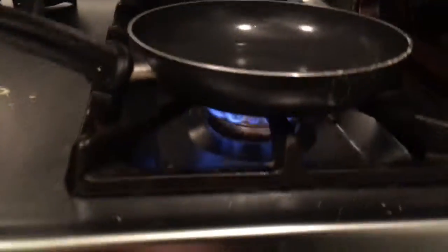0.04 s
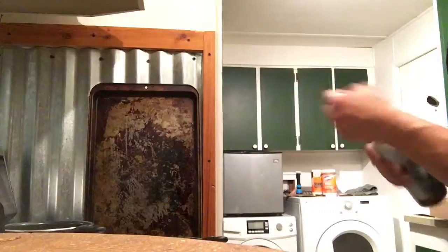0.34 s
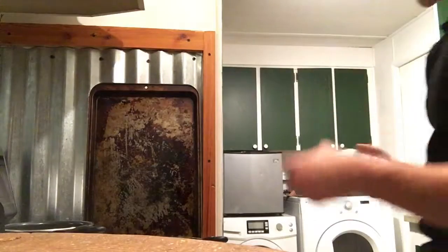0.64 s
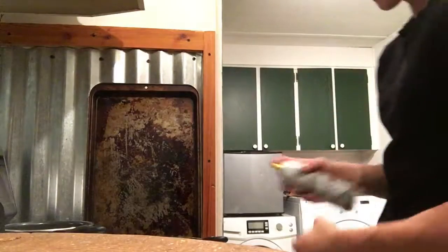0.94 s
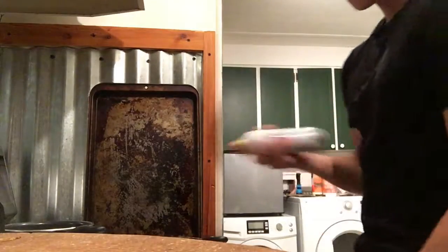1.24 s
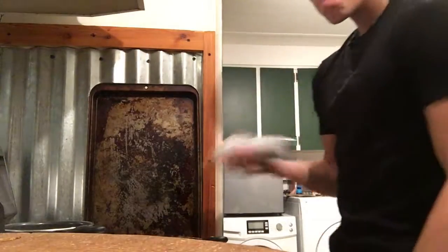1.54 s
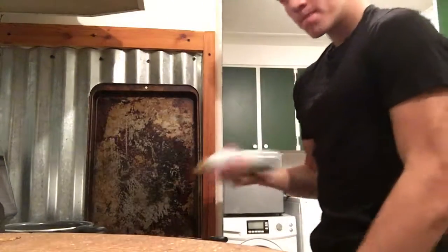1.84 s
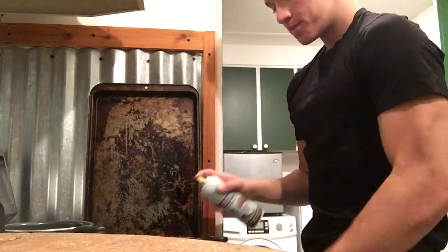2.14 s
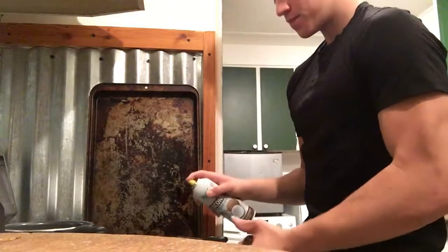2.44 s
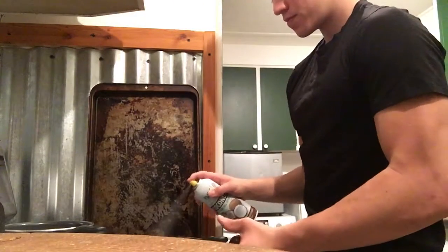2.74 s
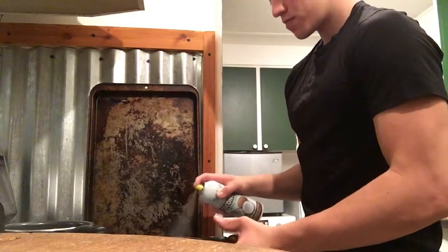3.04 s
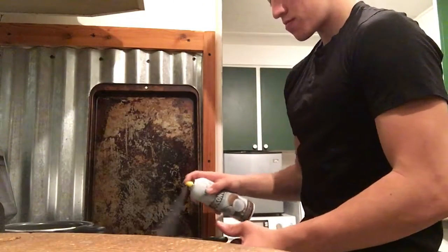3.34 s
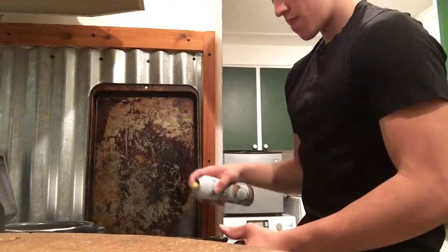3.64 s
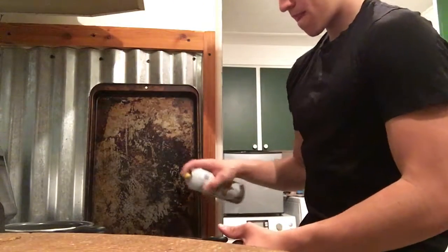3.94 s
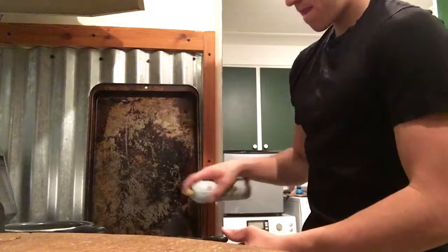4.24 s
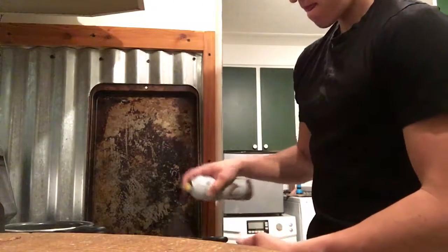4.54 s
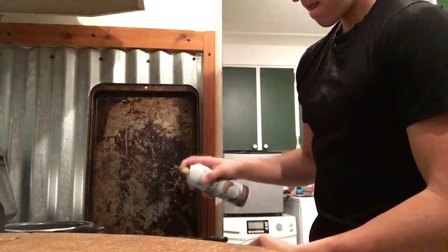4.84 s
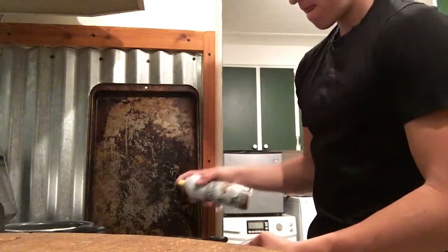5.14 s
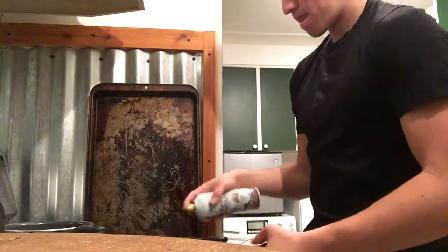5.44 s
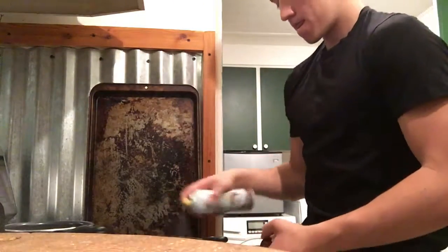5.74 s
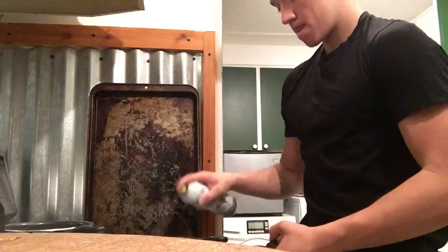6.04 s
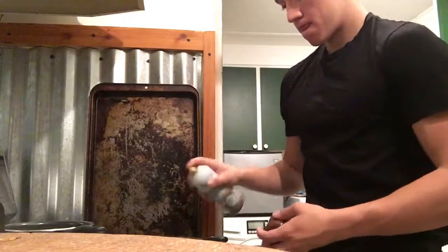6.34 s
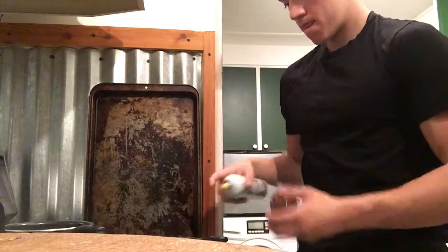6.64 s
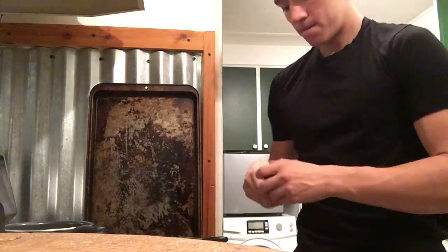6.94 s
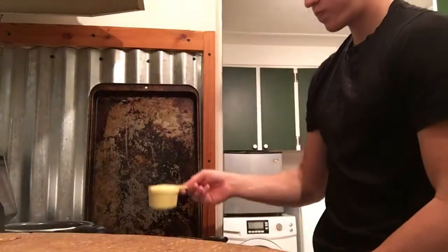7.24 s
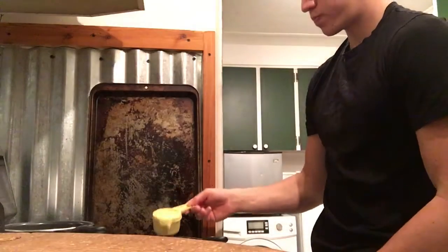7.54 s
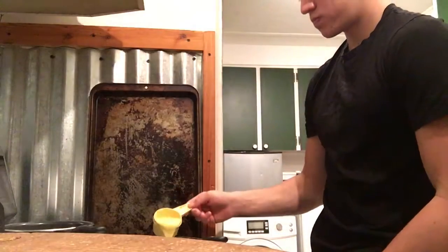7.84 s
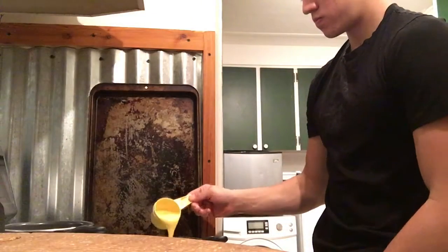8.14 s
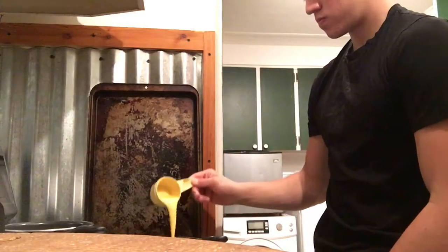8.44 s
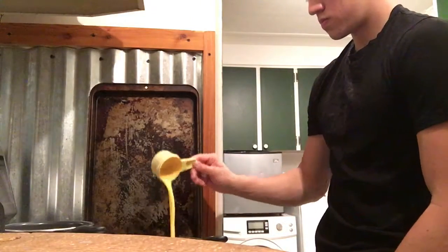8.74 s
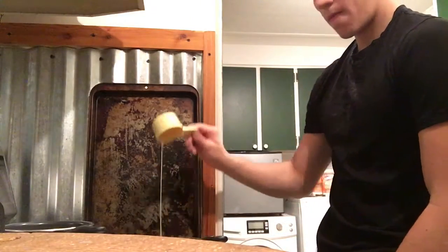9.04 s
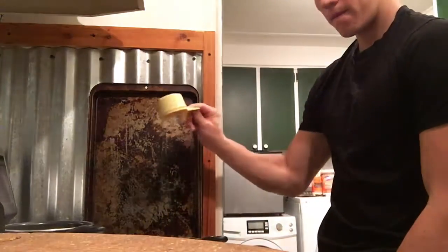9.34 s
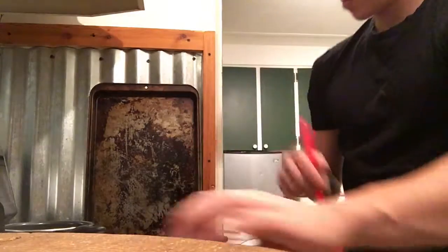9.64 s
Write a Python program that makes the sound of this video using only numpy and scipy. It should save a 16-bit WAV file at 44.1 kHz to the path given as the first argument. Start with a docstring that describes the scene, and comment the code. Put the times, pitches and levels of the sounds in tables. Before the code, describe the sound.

In a small kitchen, a gas burner mutters briefly before a plastic cap clacks off a can of cooking oil. The can is shaken quickly, sloshing and pinging. Eleven short, close hisses of spray hit a pan, each leaving a faint fizz. Another clack follows, a plastic scoop knocks lightly on the pan, and a hand slides over the counter. Appliances hum faintly throughout.

```python
"""In a small kitchen, a gas burner mutters for a moment. A can of cooking oil is uncapped with a clack
and shaken, so the oil sloshes and slaps inside. Its jet hisses over a warm pan in eleven bursts,
each leaving a faint fizz. A plastic scoop knocks on the pan as batter is poured, and a hand slides
on the counter. Appliances hum and tick behind it all, and the sound dips briefly three times."""
import sys
import numpy as np
from scipy import signal
from scipy.fft import rfft, irfft, next_fast_len
from scipy.io import wavfile
from scipy.ndimage import map_coordinates

SR = 44100
rng = np.random.default_rng(int(sys.argv[2]) if len(sys.argv) > 2 else 0)


def pcm_store(signal):
    """Save signal as 16-bit PCM."""
    levels = np.round(np.clip(np.atleast_2d(signal), -1, 1) * 32767)
    wavfile.write(sys.argv[1], SR, levels.astype(np.int16).T)


N = 435708

# Levels are relative. A fade_s is the time a sound takes to fall by 60 dB.
# presses of the nozzle: press_s, release_s, level_db, hiss_hz
SPRAY_BURSTS = [(2.658, 2.852, -30.5, 4000), (3.049, 3.167, -31, 3540), (3.367, 3.534, -30.5, 3880),
                (3.703, 3.853, -31.5, 3900), (4.164, 4.331, -30.5, 4010), (4.575, 4.692, -31, 3920),
                (4.94, 5.039, -31, 3650), (5.368, 5.454, -30, 3840), (5.707, 5.835, -30.5, 3700),
                (6.109, 6.194, -32.5, 3680), (6.467, 6.543, -31, 3470)]
# tone of the rushing jet: frequency_hz, level_db
JET_TONE = [(150, -33), (330, -11.5), (700, -19.5), (1500, -9), (2400, -7.5), (3200, 1.5), (4400, 1.5),
            (5700, -5), (6800, -1.5), (8600, -6), (12000, 0), (15500, -3)]
# the pan rings under the jet: pitch_hz, width_hz, level_db
PAN_RING = [(912, 137, 1.5), (1250, 36, 4.5), (1743, 370, 3.5), (2117, 51, 0.5), (2510, 250, 1),
            (4670, 74, 4.5)]
# the pan's hollow answers the jet: pitch_hz, first_aim_db, second_aim_db
PAN_HOLLOW = [(467, -24.5, -28.5), (874, -37, -25.5)]
# tone of sloshing oil: frequency_hz, level_db
SLOSH_TONE = [(180, -5), (300, -8.5), (378, -5.5), (685, -7), (1000, -10.5), (1460, -2.5), (3130, -2),
              (4490, -1), (6790, -5.5), (10400, -13), (15500, -17)]
# oil slaps the can, whose pitch depends on where the liquid lies: start_s, level_db, pitch_hz
OIL_SLAPS = [(.414, -36, 1264), (1.508, -44.5, 1290), (1.681, -42, 1280), (1.839, -43.5, 1470),
             (2.458, -50.5, 1250), (4.473, -46, 1287), (5.996, -39.5, 1756), (6.39, -39, 1750),
             (6.988, -38, 1230)]
# hard plastic clacks of cap and can: start_s, level_db, treble_db, fade_s
CAP_CLACKS = [(.371, -37.5, -19, 0.069), (.3942, -29.5, -3, 0.037), (.399, -34, 2.5, 0.2),
              (1.594, -38, 7, 0.036), (2.289, -47.5, -4, 0.073), (7.0138, -36, -6, 0.038),
              (7.0185, -29.5, -26, 0.055), (7.032, -29.5, -16, 0.056)]
# notes the cap rings at: pitch_hz, level_db, fade_s
CAP_NOTES = [(1197, -7, 0.17), (1710, -5, .08), (2880, 9, 0.042), (3216, 2, 0.24), (3526, -25, .08),
             (5230, -9, 0.11), (5560, 3.5, 0.17), (5600, -13, .1)]
# tone of the crack that starts a clack: frequency_hz, level_db
CRACK_TONE = [(150, -40), (500, -3.5), (1300, 3), (2100, -9), (3200, 10), (4400, -2), (5600, 2),
              (8000, -10), (15000, -16)]
# the scoop touches the pan: start_s, level_db, treble_db, fade_s
SCOOP_KNOCKS = [(7.753, -33, -26, 0.06), (7.856, -39.5, -20, 0.13), (7.884, -41, -33, 0.062),
                (9.263, -39.5, -1, 0.034)]
# notes the scoop rings at: pitch_hz, level_db, fade_s
SCOOP_NOTES = [(882, -23, 0.13), (1272, 4, 0.076), (1650, -10, .06), (1740, -4, .06), (2270, 1, 0.058),
               (2730, 8, 0.046)]
# tone of the tap that starts a knock: frequency_hz, level_db
TAP_TONE = [(150, -12), (600, -11.5), (1300, -3.5), (2500, -12), (4000, -7), (8000, -11), (15000, -39)]
# small chirps as the empty scoop is lifted: start_s, level_db, pitch_hz
SCOOP_CHIRPS = [(9.262, -43.5, 2200), (9.307, -41, 1700), (9.325, -50, 2700), (9.361, -51.5, 4400)]
# soft rubs of hand and sleeve: peak_s, level_db, fade_s, treble_db
HAND_RUBS = [(.55, -57.5, 0.62, 15.5), (.75, -60, 0.36, 5), (2.311, -56.5, 0.94, -6), (9.709, -53, 0.22, 4),
             (9.745, -50, 0.34, 2.5)]
# tone of rubbing skin and cloth: frequency_hz, level_db
RUB_TONE = [(40, -2), (90, -2), (240, -0.5), (450, -4.5), (1000, -12), (2300, -17), (14000, -40)]
# tone of oil frying on the pan: frequency_hz, level_db
FIZZ_TONE = [(500, -28), (1500, -7), (3500, 1), (6500, -5.5), (15000, -13.5)]
# tone of the gas flame: frequency_hz, level_db
BURNER_TONE = [(15, -45), (25, -12), (86, -2), (144, -13), (178, -12), (445, -18.5), (495, -21), (537, -21),
               (1080, -25), (1900, -24.5), (2700, -33), (9050, -38), (15500, -43)]
# gas whistles in the burner's nozzle: pitch_hz, width_hz, level_db
GAS_WHISTLE = [(9100, 500, 0), (12200, 300, -3), (13300, 400, -3)]
# tone of the quiet room: frequency_hz, level_db
AIR_TONE = [(30, -53), (100, -8), (130, -12.5), (175, -8.5), (240, -14.5), (480, -16), (850, -19.5),
            (1700, -18), (2600, -22), (9000, -37), (15500, -46)]
# how loud the quiet room is: time_s, level_db
AIR_LEVEL = [(.4, -63), (2.5, -65), (3.5, -61.5), (6.8, -61.5), (7.4, -66), (9.88, -64.5)]
# tone of the deep rumble in room and counter: frequency_hz, level_db
RUMBLE_TONE = [(12, -50), (22, -15), (36, -11), (58, -0.5), (85, 0), (130, -33), (600, -80)]
# humming appliances: pitch_hz, level_db
HUM_NOTES = [(59.2, -68), (120, -75), (177.6, -76)]
# an appliance fan: pitch_hz, width_hz, level_db
FAN_WHIRR = [(1322, 260, 4), (1800, 35, 9), (2904, 34, 5), (2800, 51, -1)]
# the ring of the faint ticking: pitch_hz, width_hz, level_db
TICK_RING = [(1800, 740, -5), (4300, 240, 5.5), (5600, 1200, 3), (8000, 570, -3), (9350, 240, 1)]
# how long the walls echo: frequency_hz, fade_s
WALL_FADE = [(150, 0.62), (1000, 0.25), (4000, 0.24), (9000, 0.23), (15000, 0.17)]
# brief dips in loudness: middle_s, half_width_s
DIPS = [(0.354, 0.031), (7.057, 0.03), (9.588, 0.03)]

FIRST_DIP_S, SECOND_DIP_S = DIPS[0][0], DIPS[1][0]
AIM_SHIFT_S = 4  # the hand turns the jet to another part of the pan


def spray():
    """The valve opens in two steps; the jet hisses at once, and the pan's hollow follows."""
    valve, bursts = np.zeros(N), np.zeros(N)
    t = np.arange(SR // 2) / SR
    for press, release, db, hiss_hz in SPRAY_BURSTS:
        opening = 0.37 * (1 - np.exp(-t / 0.0023)) + 0.5 * (1 - np.exp(-(t / 0.019) ** 2))
        closing = np.exp(-np.maximum(t - (release - press - .008), 0) / 0.013)
        flow = amp(db) * opening * closing
        hiss = amp(-12.5) * ringing_noise([(hiss_hz, 200, 0), (1.75 * hiss_hz, 250, -7)], len(t))
        hollow = sum(amp(first_db if press < AIM_SHIFT_S else second_db)
                     * ringing_noise([(hz, 90, 0)], len(t)) for hz, first_db, second_db in PAN_HOLLOW)
        hollow *= 1 - np.exp(-t / 0.013)
        drops = treble(rng.standard_normal(len(t)), treble_db=0.5, corner_hz=7000)
        spit = amp(db - 19.5) * np.exp(-t / 0.0095) * drops  # the first drops clear the nozzle
        add(valve, press, flow)
        add(bursts, press, flow * (hiss + hollow) + spit)
    sputter = amp(0.8 * wobble(53) + 0.12 * wobble(300))  # droplets make the flow uneven
    surfaces = [(.0009, 0.000047, 0.16), (.0027, 0.000163, 0.4), (.0068, .00015, .3)]
    jet = moving_echoes(noise(JET_TONE), surfaces) + amp(-13.5) * ringing_noise(PAN_RING)
    return sputter * (valve * jet + bursts)


def strokes(first_s=1.28, gap_s=.103, strongest_s=1.5):
    """Lists start_s, level_db for nine even shakes: a gentle start, full effort, then easing off."""
    times = first_s + gap_s * np.arange(9)
    levels_db = -48 - 23.5 * (times - strongest_s) ** 2
    levels_db[0] -= 5
    return np.transpose([times, levels_db])


def sloshing():
    """At each shake the oil hits an end of the can and fizzes; the gas pocket rings at a new pitch."""
    surge, pocket = np.zeros(N), np.zeros(N)
    t = np.arange(SR // 3) / SR
    for start, db in strokes():
        settling = np.exp(-(t / 0.039) ** 2) + 0.47 * np.exp(-t / 0.066)
        power = amp(db) ** 2 * (1 - np.exp(-t / 0.0017)) ** 2 * settling
        pocket_hz = 1750 * np.exp(0.3 * rng.standard_normal())
        ring = ringing_noise([(pocket_hz, 160, 0), (2.54 * pocket_hz, 300, -3)], len(t))
        add(surge, start, power)
        add(pocket, start, amp(-18) * np.sqrt(power) * ring)
    foam = unit(noise(SLOSH_TONE) * amp(1.4 * wobble(350) + 0.38 * wobble(60)))
    return amp(-1.2) * np.sqrt(surge) * foam + pocket


def cap_and_fingers(from_s=6.4, to_s=6.8, ticks=4):
    """The plastic cap clacks, and fingers tick faintly as they shift on the can."""
    places = (np.arange(ticks) + rng.random(ticks)) / ticks
    grip = [(from_s + (to_s - from_s) * place, -46, 5, 0.057) for place in places]  # as in CAP_CLACKS
    return knocks(CAP_CLACKS + grip, CAP_NOTES, CRACK_TONE, ring_db=-14, corner_hz=4080)


def oil_slaps(lag_s=0.038, pitch_hz=1500):
    """Oil slaps the can and makes it ping, now and then and just after every shake."""
    after_shakes = [(start + lag_s, db - 2.5, pitch_hz * np.exp(0.116 * rng.standard_normal()))
                    for start, db in strokes()]
    return pings(OIL_SLAPS + after_shakes, bend=0.089, fade_s=0.088)


def scoop():
    """The plastic scoop knocks on the pan and chirps as it is lifted."""
    taps = knocks(SCOOP_KNOCKS, SCOOP_NOTES, TAP_TONE, ring_db=-13, corner_hz=2950)
    return taps + pings(SCOOP_CHIRPS, bend=0.12, fade_s=0.076)


def knocks(events, notes, crack_tone, ring_db, corner_hz):
    """Each hit is a short crack plus the object's own notes, a little different every time."""
    out = np.zeros(N)
    t = np.arange(SR // 4) / SR
    for start, db, treble_db, fade_s in events:
        crack = noise(crack_tone, len(t)) * amp(-60 * t / fade_s)
        ring = sum(amp(note_db + rng.normal(0, 1.2) - 60 * t / note_fade_s)
                   * np.sin(2 * np.pi * hz * rng.normal(1, 0.0055) * t)
                   for hz, note_db, note_fade_s in notes)
        hit = treble(crack + amp(ring_db) * ring, treble_db, corner_hz)
        strength = hit[:SR // 200].std()  # of the first 5 ms
        add(out, start, amp(db - 10) * hit / strength)
    return out


def pings(events, bend, fade_s):
    """Each ping is a brief ring that bends up in pitch, with a small splash of noise."""
    out = np.zeros(N)
    t = np.arange(SR // 4) / SR
    for start, db, hz in events:
        phase = 2 * np.pi * hz * np.cumsum(1 - bend * np.exp(-t / 0.0037)) / SR
        ring = (np.sin(phase) + 0.18 * np.sin(1.9 * phase)) * amp(-60 * t / fade_s)
        splash = unit(filtered(rng.standard_normal(len(t)), lambda f: 1 / (1 + ((f - hz) / 550) ** 2)))
        splash *= 0.66 * amp(-60 * t / 0.068)
        add(out, start, amp(db - 3) * (ring + splash) * (1 - np.exp(-t / 0.0015)))
    return out


def rubs(rise_s=0.0091):
    """Skin and cloth rub over the counter and the can, swelling fast and then fading."""
    out = np.zeros(N)
    friction = unit(noise(RUB_TONE) * amp(4.1 * wobble(120)))
    for peak_s, db, fade_s, treble_db in HAND_RUBS:
        start = max(peak_s - .3, 0)
        piece = unit(treble(friction[round(start * SR):][:SR], treble_db, corner_hz=766))
        t = start + np.arange(len(piece)) / SR - peak_s
        swell = np.exp(-(np.minimum(t, 0) / rise_s) ** 2)
        add(out, start, piece * swell * amp(db - 60 * np.maximum(t, 0) / fade_s))
    return out


def counter(peak_s=9.78, width_s=0.18):
    """The counter rumbles while a palm leans and slides on it."""
    return amp(-58) * np.exp(-((clock() - peak_s) / width_s) ** 2) * noise(RUMBLE_TONE)


def frying():
    """Each burst leaves oil that fizzes and settles on the warm pan; batter crackles as it lands."""
    t = clock()
    oil = sum((t > release) * np.exp(-np.abs(t - release) / 0.18) for _, release, *_ in SPRAY_BURSTS)
    fizz = unit(noise(FIZZ_TONE) * amp(1.5 * wobble(760) + 2.3 * wobble(35)))
    pour = np.exp(-((t - 8.35) / 0.49) ** 2)
    crackle = unit(ringing_noise([(12500, 2200, 0)]) * amp(5 * wobble(70)))
    return amp(-61) * np.sqrt(oil) * fizz + amp(-86) * pour * crackle


def burner():
    """The flame mutters over a low note while gas whistles thinly in the nozzle."""
    flame = amp(-60.5) * noise(BURNER_TONE) + hum(177.4, db=-64.5, drift=.2)
    return flame + amp(-78) * ringing_noise(GAS_WHISTLE)


def room_air():
    """A soft rush and a deep, swaying rumble that is a little louder after the second dip."""
    t = clock()
    rumble_db = np.where(t < SECOND_DIP_S, -68, -65.5) + 2.5 * wobble(2.98)
    air_db = np.interp(t, *np.transpose(AIR_LEVEL)) + 0.23 * wobble(5.1)
    return amp(air_db) * noise(AIR_TONE) + amp(rumble_db) * noise(RUMBLE_TONE)


def appliances():
    """Appliances give off a low hum, a thin whine and the whirr of a fan."""
    low_hum = sum(hum(hz, db, drift=0.71) for hz, db in HUM_NOTES)
    whine = hum(3122, db=-78.5, drift=0.85)
    fan = amp(-69.5 + wobble(16)) * ringing_noise(FAN_WHIRR)
    return low_hum + whine + fan


def ticking(rate_hz=60, scatter_db=3):
    """An appliance ticks fast and faintly, with uneven strength; every other tick is weaker."""
    turns = clock() * rate_hz
    index = np.arange(int(turns[-1]) + 1)
    sizes = amp(scatter_db * rng.uniform(-2.2, 1, len(index)) - 9.4 * (index % 2))
    fading = np.exp(-(turns % 1) / rate_hz / 0.0086)
    return amp(-76.5) * unit(sizes[turns.astype(int)] * fading * ringing_noise(TICK_RING))


def moving_echoes(x, surfaces):
    """Echoes from nearby surfaces change the tone as the hand moves."""
    t = clock()
    echoes = sum(gain * map_coordinates(x, [(t - delay_s - sway_s * wobble(2)) * SR])
                 for delay_s, sway_s, gain in surfaces)
    return unit(x + echoes)


def kitchen(x, echo_db):
    """The direct sound plus the echo off the walls, whose high notes die first."""
    hz, t, spectrum = signal.stft(rng.standard_normal(SR // 2), SR, nperseg=256)
    fading = amp(-60 * t / along(WALL_FADE, hz)[:, None])
    tail = signal.istft(spectrum * fading, SR, nperseg=256)[1]
    tail = np.pad(tail / np.linalg.norm(tail), (220, 0))  # arrives 5 ms late
    return (x + amp(echo_db) * signal.fftconvolve(x, tail)[:N]) / np.hypot(1, amp(echo_db))


def hum(hz, db, drift):
    """One note that wavers slightly in loudness and pitch."""
    gain = amp(db + 0.95 * wobble(5.5)) * np.sqrt(2)
    return gain * np.sin(2 * np.pi * hz * clock() + drift * wobble(5.2))


def noise(tone, size=N):
    """Noise of strength 1, shaped by a tone table."""
    return unit(filtered(rng.standard_normal(size), lambda hz: amp(along(tone, hz))))


def ringing_noise(peaks, size=N):
    """Noise of strength 1 that rings at each peak: pitch_hz, width_hz, level_db."""
    def body(f):
        return sum(amp(db) * 1j * f * width / (hz * hz - f * f + 1j * f * width)
                   for hz, width, db in peaks)
    return unit(filtered(rng.standard_normal(size), body))


def treble(x, treble_db, corner_hz):
    """Turn everything above the corner up or down."""
    return filtered(x, lambda hz: amp(treble_db * hz ** 4 / (hz ** 4 + corner_hz ** 4)))


def filtered(x, response):
    """Scale each frequency in x by response(hz)."""
    size = next_fast_len(len(x) + 8192)
    return irfft(rfft(x, size) * response(np.fft.rfftfreq(size, 1 / SR)), size)[:len(x)]


def wobble(rate):
    """A smooth random curve through `rate` points a second."""
    return map_coordinates(rng.standard_normal(int(N * rate / SR) + 4), [clock() * rate])


def along(table, hz):
    """Read between a table's rows, giving each octave equal room."""
    frequencies, values = np.transpose(table)
    return np.interp(np.log(hz + 1), np.log(frequencies + 1), values)


def add(track, start_s, sound):
    """Mix a sound into the track."""
    part = track[round(start_s * SR):][:len(sound)]
    part += sound[:len(part)]


def amp(db):
    """Turn decibels into a multiplier."""
    return 10 ** (np.asarray(db) / 20)


def unit(x):
    """Scale to an average strength (rms) of 1."""
    return x / np.sqrt(np.mean(x ** 2) + 1e-20)


def clock():
    """The time of every sample, in seconds."""
    return np.arange(N) / SR


def scene():
    """All the kitchen's sounds, the same in both channels; the can's ring ends at the second dip."""
    t = clock()
    can = cap_and_fingers() + oil_slaps()
    scooping = scoop()
    near = kitchen(spray(), echo_db=-9) + kitchen(can, echo_db=-11.5) * (t < SECOND_DIP_S)
    far = kitchen(scooping + sloshing() + rubs(), echo_db=-6)
    cooking = near + far + counter() + frying()
    background = np.where(t < FIRST_DIP_S, burner(), room_air() + appliances())
    mono = cooking + background + ticking()
    return np.array([mono, mono])


def record(dry):
    """The level dips three times; the microphone softens one high band and loses the very top."""
    def microphone(hz):
        notch_db = -6 * np.exp(-((hz - 10450) / 520) ** 2)
        top_db = -np.clip(hz - 15700, 0, 400) / 4
        return amp(notch_db + top_db)
    dips = np.prod([np.clip(np.abs(clock() - s) / width, .04, 1) for s, width in DIPS], axis=0)
    return np.array([filtered(channel * dips, microphone) for channel in dry])


dry = scene()
out = record(dry)
pcm_store(out)
```